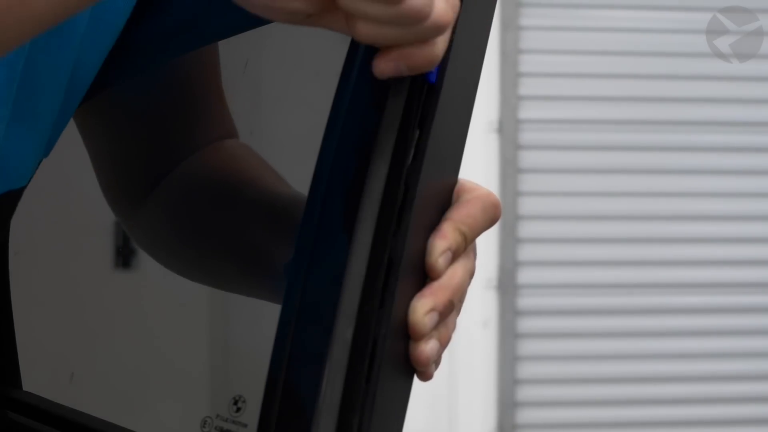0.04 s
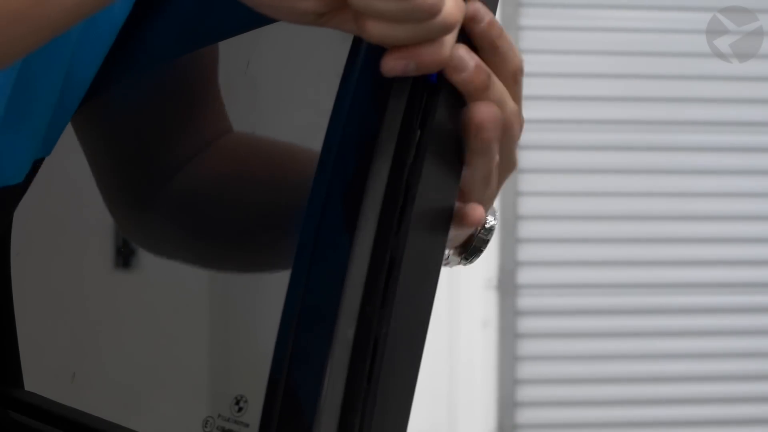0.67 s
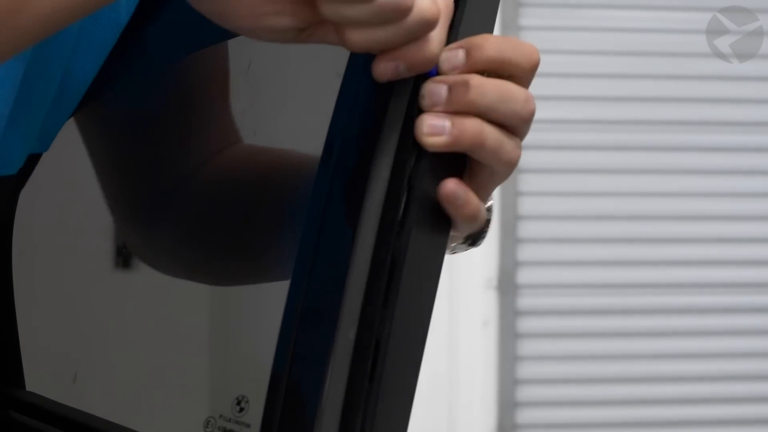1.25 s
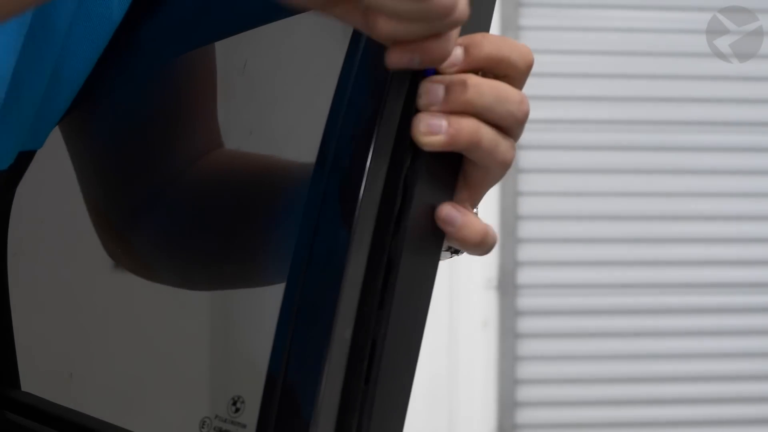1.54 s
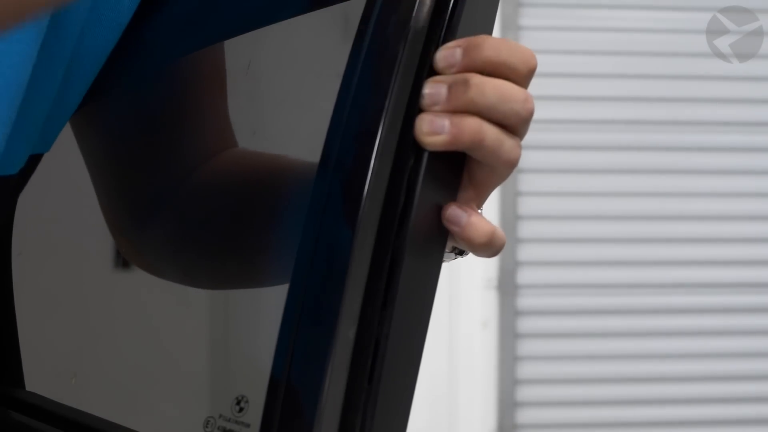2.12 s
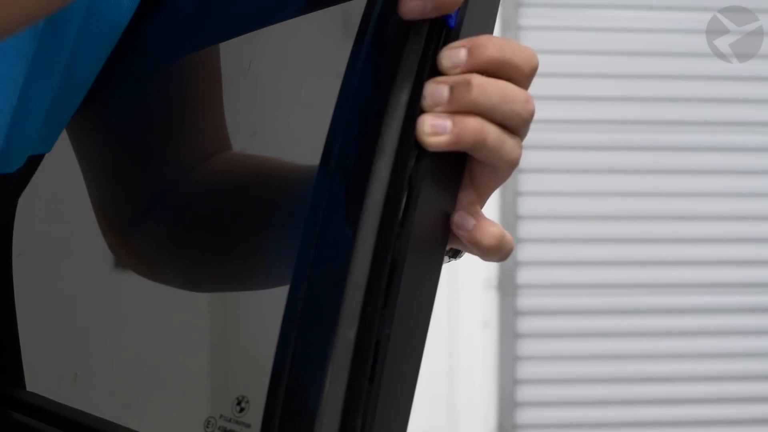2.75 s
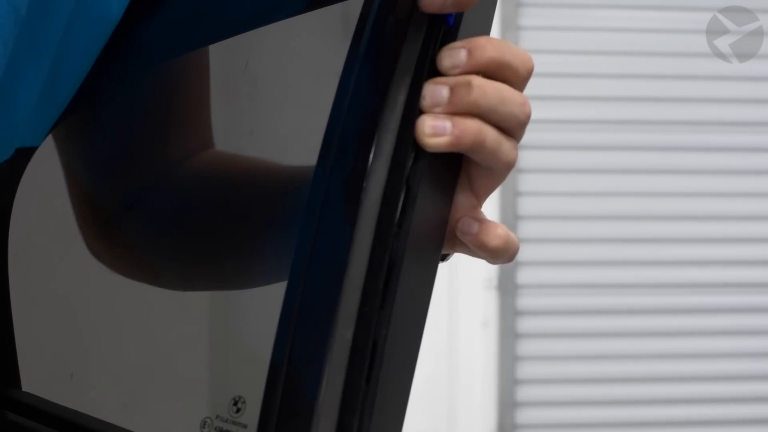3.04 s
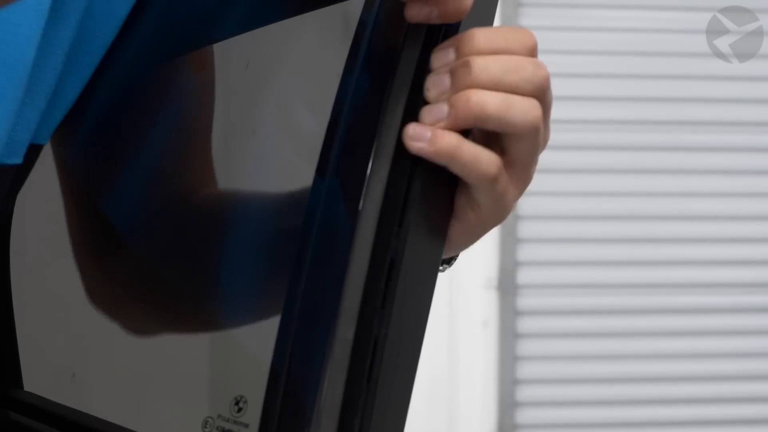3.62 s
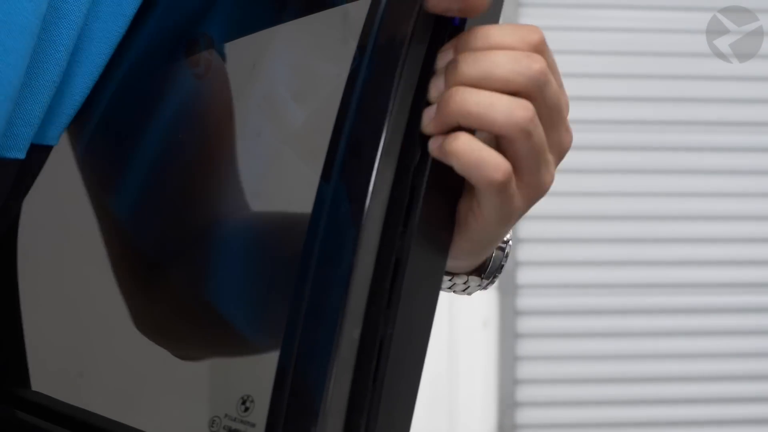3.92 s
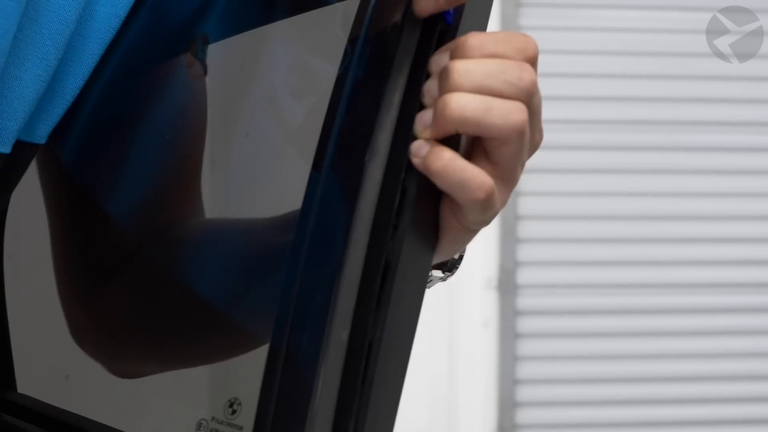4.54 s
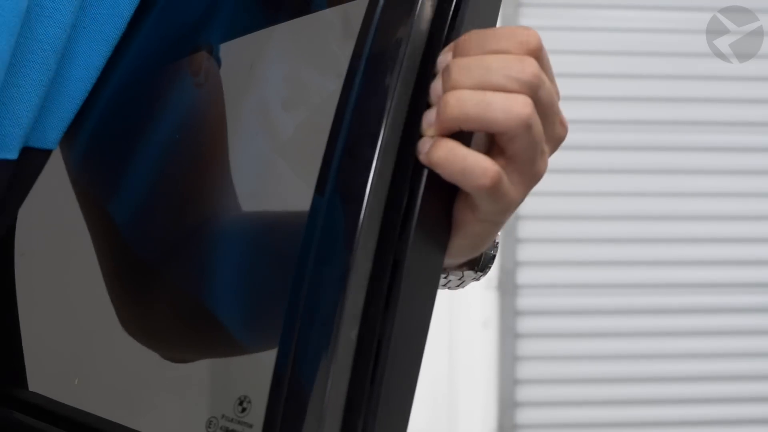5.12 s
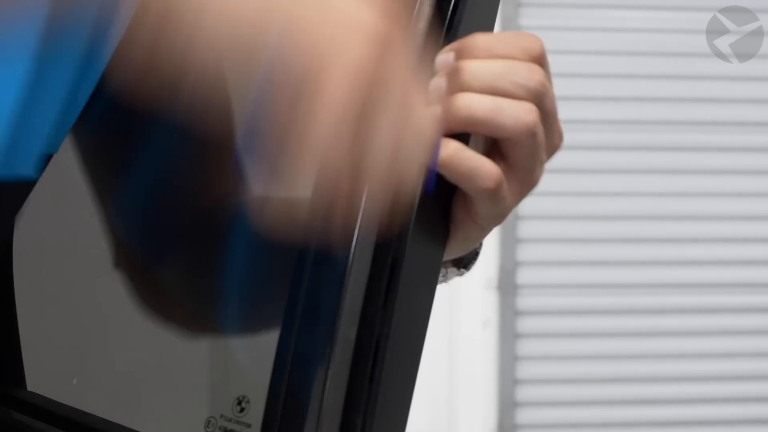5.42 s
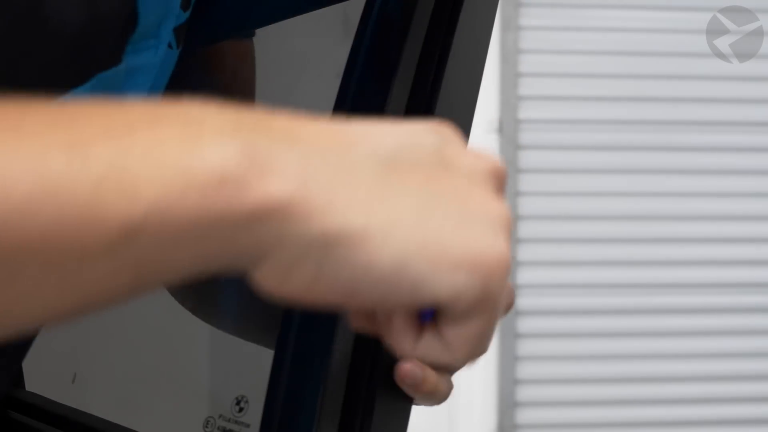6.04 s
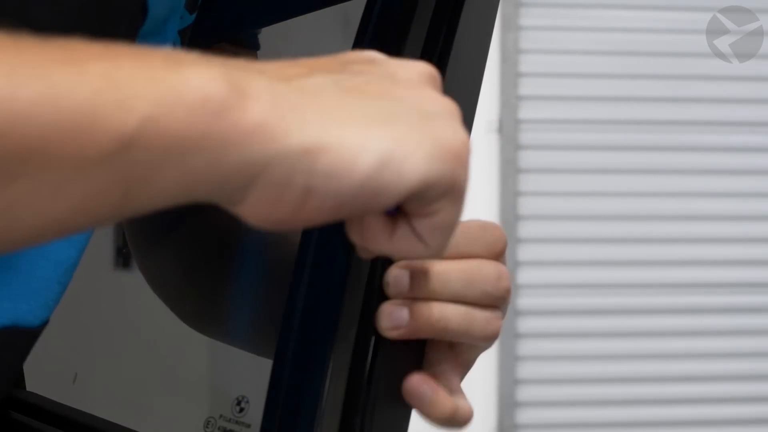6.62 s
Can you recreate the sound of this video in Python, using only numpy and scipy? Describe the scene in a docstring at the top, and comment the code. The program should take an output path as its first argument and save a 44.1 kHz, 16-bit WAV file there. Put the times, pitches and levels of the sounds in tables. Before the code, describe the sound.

A loud knock on a car door's window frame opens the sound, with a low thump from the door panel. Around 0.4 seconds a plastic pry blade scrapes and gives a tiny rising squeak, and a clip clicks at 0.8 seconds as a sleeve rustles softly. From 1.5 to 2.9 seconds come scattered light clicks, short scrapes and dull bumps. The blade creaks briefly at 3 seconds, followed by a click and a soft thump near 3.7. Small clicks at 4.3 lead into the loudest snaps, about four sharp plastic cracks between 4.5 and 4.9 seconds, then a knock and one more snap at 5.1. Lighter taps, scrapes and cloth rustles continue to about 7 seconds. Everything sounds close, with a short workshop reverberation, over a faint steady ventilation rumble and a thin, high electrical whine.

```python
"""A plastic trim tool prises a cover strip off a car door's window frame in a reverberant workshop.
Over a steady ventilation rumble and a thin electrical whine, a knock sets the frame's modes ringing
and the door skin thumps. The blade scrapes and squeaks by stick-slip friction, a sleeve rustles,
and clips begin to let go with sharp snaps. The blade creaks at 3 s; the loudest snaps come between
4.5 and 5 s, and lighter knocks, scrapes and rustles follow."""
import sys
import numpy as np
from scipy import signal
from scipy.fft import rfft, irfft, next_fast_len
from scipy.io import wavfile

SR = 44100
rng = np.random.default_rng(int(sys.argv[2]) if len(sys.argv) > 2 else 0)


def digitize_waveform(pressure):
    """Quantize a signal to 16-bit integers and store it at the path in sys.argv[1].

    Rows of a 2-D input are taken as channels; values are limited to [-1, 1].
    """
    field = np.atleast_2d(pressure).T
    bounded = np.clip(field, -1, 1)
    quanta = np.round(bounded * 32767).astype(np.int16)
    wavfile.write(sys.argv[1], SR, quanta)


N = 302926


def from_db(db):
    return 10 ** (np.asarray(db) / 20)

def unit_rms(x):
    return x / np.sqrt(np.mean(x ** 2) + 1e-20)

def at_hz(points, hz, column=1):
    """Interpolation of one column of a table along a log-frequency axis."""
    table = np.array(points)
    return np.interp(np.log(np.maximum(hz, 1)), np.log(table[:, 0]), table[:, column])

def add(track, time_s, sound):
    """Superposition: a sound sums into the track from the given time."""
    start = int(np.clip(round(time_s * SR), 0, N - 1))
    track[start:start + len(sound)] += sound[:N - start]

def coloured_noise(spectrum):
    """Spectral shaping of white noise, at unit rms."""
    size = next_fast_len(N)
    hz = np.fft.rfftfreq(size, 1 / SR)
    white = rfft(rng.standard_normal(size))
    return unit_rms(irfft(white * from_db(at_hz(spectrum, hz)))[:N])


# ventilation and room air (frequency [Hz], relative spectral density [dB])
AIR_SPECTRUM = [(15, -33.5), (25, -7), (76, -2), (123, -10), (309, -9), (754, -16), (962, -13),
                (1560, -27.5), (2000, -25.5), (3720, -30.5), (4140, -32), (5730, -28), (8590, -37.5),
                (13200, -40.5), (16000, -39)]

def ventilation(rms_db):
    """Broadband noise: moving air, strongest at low frequencies."""
    return from_db(rms_db) * coloured_noise(AIR_SPECTRUM)


# electrical tones and sidebands (frequency [Hz], rms level [dB])
WHINE_LINES = [(1680, -87), (3601, -91), (3720, -86.5), (5405, -83.5), (5523, -86.5), (5642, -82.5),
               (5762, -73), (5882, -83.5), (6121, -87.5), (6245, -92), (6481, -82), (7445, -86.5),
               (8161, -96.5)]

def whine(waver_hz):
    """Line spectrum: each tone wavers under slight random frequency modulation."""
    out = 0
    for hz, db in WHINE_LINES:
        waver = np.interp(np.arange(N), np.linspace(0, N, 140), rng.standard_normal(140))
        phase = 2 * np.pi * np.cumsum(hz + waver_hz * waver) / SR
        out += from_db(db) * np.sqrt(2) * np.sin(phase)
    return out


# limits of the five mode families: thud, knock, snap, crack, sizzle (frequency [Hz])
FAMILY_EDGES = [90, 650, 1600, 4500, 9000, 16000]

def families(modes):
    """Band division: the modes fall into five families by frequency."""
    modes = np.array(modes, float)
    hz = modes[:, 0]
    return [modes[(hz >= low) & (hz < high)] for low, high in zip(FAMILY_EDGES, FAMILY_EDGES[1:])]


# typical pitch of each family (frequency [Hz])
FAMILY_PITCHES = [400, 1000, 2700, 6400, 12000]

def contact_spectra(contacts, balance_db, thud_lag):
    """Spectral tilt about 1600 Hz: a contact's level and brightness become five family levels."""
    rows, octaves = [], np.log2(np.array(FAMILY_PITCHES) / 1600)
    for *timing, db, brightness in contacts:
        droop_db = 0.082 * min(brightness, 0) * octaves ** 2   # soft contacts lose both extremes
        levels_db = db + brightness * octaves + droop_db + np.array(balance_db)
        levels_db[0] -= thud_lag * (db + 50)   # harder contacts are briefer, so the thud falls behind
        rows.append((*timing, *levels_db))
    return rows

def resonate(force, modes, damping=1):
    """Modal superposition: a force drives damped resonators, summed with alternating sign."""
    out = 0
    for k, (hz, width, db) in enumerate(modes):
        radius = np.exp(-np.pi * width * damping / SR)
        feedback = [1, -2 * radius * np.cos(2 * np.pi * hz / SR), radius ** 2]
        gain = (-1) ** k * from_db(db) * (1 - radius ** 2) / 2
        out += gain * signal.lfilter([1, 0, -1], feedback, force + 1e-18)
    return out

def excite(force, modes, levels_db, window_s, damping, detune):
    """Forced response: each family answers at its own rms level over the opening window."""
    out = 0
    for family, db in zip(families(modes), levels_db):
        hz = family[:, 0] * (1 + detune * rng.standard_normal(len(family)))   # load shifts the modes
        ring = resonate(force, np.column_stack([hz, family[:, 1:]]), damping)
        # a narrow part radiates little far below or above its modes
        band_hz = [max(hz.min() / 2.5, 200), min(2 * hz.max(), SR * .45)]
        sound = signal.sosfilt(signal.butter(2, band_hz, "band", fs=SR, output="sos"), ring)
        out += from_db(db) * sound / np.sqrt(np.mean(sound[:int(window_s * SR)] ** 2) + 1e-30)
    return out

IMPACT_WINDOW_S, SHORTEST_SLIP_S = .015, .0005

def impacts(contacts, modes, grit, soften_db, damping, detune):
    """Impact excitation: an impulse and a short gritty slip, which lasts longer in gentle blows."""
    out, t = np.zeros(N), np.arange(SR // 8) / SR
    hardest_db = np.max(np.array(contacts)[:, 1:])
    for time_s, *levels_db in contacts:
        slip_s = SHORTEST_SLIP_S * from_db(soften_db * (hardest_db - max(levels_db)) / 20)
        force = grit * rng.standard_normal(len(t)) * np.exp(-t / slip_s)
        force[0] += 1
        add(out, time_s, excite(force, modes, levels_db, IMPACT_WINDOW_S, damping, detune))
    return out

def radiate_to_walls(contacts, modes, blur, size=512):
    """Incoherent summation: over all directions the modes add by power, without notches."""
    hz, out = np.fft.rfftfreq(size, 1 / SR), np.zeros(N)
    shapes = []
    for family in families(modes):
        shape = sum(from_db(db) ** 2 / (1 + ((hz - centre) / (blur * width)) ** 2) ** 2
                    for centre, width, db in family)
        shapes.append(shape / shape.mean())
    for time_s, *levels_db in contacts:
        power = from_db(levels_db) ** 2 @ np.array(shapes) * IMPACT_WINDOW_S * SR
        pulse = np.fft.fftshift(irfft(np.sqrt(power)))
        add(out, time_s, pulse * np.hanning(size))
    return out


# door frame resonances (frequency [Hz], nominal bandwidth [Hz], gain [dB])
FRAME_MODES = [(240, 22, -22), (315, 26, -2.5), (384.7, 31, -1.5), (465, 56, -9.5), (545, 37, -6.5),
               (687, 110, 1.5), (706, 180, -12), (843, 21, -4), (1043.7, 120, -6.5), (1141, 120, -2),
               (1233, 85, -0.5), (1460, 130, -8.5), (1490, 62, -9), (1660, 210, -11), (1868, 540, -16),
               (2520, 300, -13.5), (3212, 230, -8), (3690, 690, -18.5), (4410, 240, -15), (5150, 350, -13),
               (6100, 530, -13.5), (7256, 260, -20), (9700, 2000, -22), (13150, 490, -19)]
# weight of each family in a knock (gain [dB])
KNOCK_WEIGHTS = [-4, 0.5, -1.5, 0.5, -1.5]
# tool and hands meet the frame (time [s], nominal level [dB], brightness [dB/octave])
FRAME_KNOCKS = [(.0297, -19, -2.5), (.4165, -57.5, -3.5), (.4562, -57, -4.5), (.8451, -53.5, -5.5),
                (1.0983, -67, -7.5), (1.5903, -57, -5.5), (1.8264, -56, -7.5), (1.8935, -55, -7.5),
                (2.2989, -61, -4.5), (2.4635, -59, -5.5), (2.4874, -57, -5), (2.767, -60.5, -7.5),
                (3.1746, -66.5, -5), (3.757, -63, -5.5), (3.8056, -56, -6), (4.159, -65.5, -6),
                (4.2072, -71, -7.5), (4.9185, -42.5, -4.5), (5.4956, -64, -3.5), (5.981, -60, -9.5),
                (6.1558, -62.5, -6), (6.3133, -61.5, -10)]

def frame_knocks():
    """Free vibration of the struck frame; returns the direct sound and that sent to the walls."""
    knocks = contact_spectra(FRAME_KNOCKS, KNOCK_WEIGHTS, thud_lag=0.17)
    direct = impacts(knocks, FRAME_MODES, grit=0.21, soften_db=8, damping=0.83, detune=.015)
    return direct, radiate_to_walls(knocks, FRAME_MODES, blur=1.5)

def ring_from_taps(taps, modes):
    """Impulse response: clean taps ring a few modes, scaled to peak at the highest tap level."""
    force = np.zeros(N)
    for time_s, db in taps:
        add(force, time_s, from_db([db]))
    top_hz = max(mode[0] for mode in modes)
    ring = signal.sosfilt(signal.butter(2, top_hz, fs=SR, output="sos"), resonate(force, modes))
    return ring * force.max() / np.abs(ring).max()


# door skin resonances (frequency [Hz], bandwidth [Hz], gain [dB])
DOOR_MODES = [(102.06, 30, -4.5), (128, 22, -7), (166, 14, -1.5), (222.7, 30, 5), (294, 38, 1)]
# heavy pushes (time [s], level [dB])
DOOR_PUSHES = [(.034, -35.5), (1.526, -50), (1.895, -41), (2.3, -47), (3.758, -42.5), (4.922, -44),
               (6.315, -50.5)]

def door_thumps():
    """Panel vibration: the door gives under a push and rings in its low modes."""
    return ring_from_taps(DOOR_PUSHES, DOOR_MODES)


# echoes from floor and nearby walls (delay [s], gain [dB])
ECHO_PATHS = [(.0085, -24.5), (0.0272, -23), (.0305, -22), (0.037, -25), (.0615, -61), (.088, -26)]

def early_reflections(x, cutoff_hz):
    """Specular reflection: each path returns a delayed, dulled copy."""
    out = np.zeros(N)
    dulled = signal.sosfilt(signal.butter(1, cutoff_hz, fs=SR, output="sos"), x)
    for delay_s, db in ECHO_PATHS:
        add(out, delay_s, from_db(db) * dulled)
    return out


# workshop reverberation (frequency [Hz], energy gain [dB], reverberation time T60 [s])
ROOM_DECAY = [(100, -10.5, 0.95), (348.1, -10.5, 0.88), (674, -8, .75), (1190, -7.5, .8),
              (1970, -13.5, 0.79), (3516, -15.5, 0.84), (6000, -16, .65), (8833, -18, 0.42),
              (14230, -26.5, 0.27)]

def reverberation(x, wall_delay_s, early_db):
    """Diffuse field: it swells as sound returns from the walls, then decays, the treble first."""
    t, hz = np.arange(SR) / SR, np.fft.rfftfreq(SR, 1 / SR)
    white = rfft(rng.standard_normal(SR))
    swell = np.where(t < wall_delay_s, from_db(early_db), 1)
    edges, response = np.geomspace(60, 17000, 19), np.zeros(SR)
    for low, high in zip(edges, edges[1:]):
        centre = np.sqrt(low * high)
        band = irfft(white * (hz >= low) * (hz < high), SR)
        decay = from_db(-60 * t / at_hz(ROOM_DECAY, centre, column=2))
        gain = from_db(at_hz(ROOM_DECAY, centre)) * np.sqrt(2 * (high - low)) / SR
        response += gain * unit_rms(band * swell * decay)
    return signal.fftconvolve(x, response)[:N]


# plastic strip resonances (frequency [Hz], nominal bandwidth [Hz], gain [dB])
STRIP_MODES = [(165, 32, -15.5), (225, 44, -15), (305.5, 31, -10.5), (388, 18, -12), (603, 87, -17),
               (679, 60, -7), (883, 78, -9.5), (1172, 80, -1), (1386, 64, -3), (1607.8, 140, 2.5),
               (1863, 73, 7), (2190, 570, 5), (2664, 680, 2.5), (2784, 105, 9.5), (3420, 450, 4),
               (3870, 110, 2.5), (4080, 210, -9), (4640, 245, -2.5), (5110, 1700, -5.5), (6290, 940, -3.5),
               (7860, 460, -17.5), (9600, 210, -17), (11470, 820, -16), (13700, 2000, -20.5)]
# weight of each family in a scrape (gain [dB])
SCRAPE_WEIGHTS = [1, 0, 6.5, 2.5, -8]
# blade and fingers slide (time [s], duration [s], nominal level [dB], brightness [dB/octave])
SCRAPE_STROKES = [(.43, 0.019, -57.5, -4), (.538, 0.017, -61.5, -2), (1.536, 0.057, -73, -7.5),
                  (1.831, 0.02, -57.5, -5), (1.852, 0.03, -53.5, -3.3), (2.38, 0.048, -72.5, -3),
                  (2.428, 0.06, -64, -2), (2.497, 0.06, -67, -6.5), (2.652, 0.017, -57, -3),
                  (3.19, .12, -74, -4), (3.751, .022, -59, 0.2), (4.256, 0.065, -70.5, -3.5),
                  (5.096, .015, -48, 0.4), (5.595, 0.058, -65.5, -3.5), (6.492, 0.056, -66, -0.7)]

def strip_scrapes(slips_per_s, spread_db):
    """Stick-slip friction: each stroke sends a rush of uneven clicks into the strip."""
    out, t = np.zeros(N), np.arange(SR // 5) / SR
    strokes = contact_spectra(SCRAPE_STROKES, SCRAPE_WEIGHTS, thud_lag=0.18)
    for time_s, length_s, *levels_db in strokes:
        pressure = np.sqrt(np.interp(t / length_s, [0, 0.1, 1], [0, 1, 0]))   # bites, then eases off
        slips = (rng.random(len(t)) < slips_per_s / SR) * rng.choice([-1, 1], len(t))
        force = pressure * slips * from_db(spread_db * rng.standard_normal(len(t)))
        add(out, time_s, excite(force, STRIP_MODES, levels_db, length_s, damping=1.1, detune=0.067))
    return out


# the blade is drawn out (time [s], frequency [Hz], level [dB])
SQUEAK_GLIDE = [(.431, 2500, -69), (.435, 3380, -61), (0.439, 4300, -57), (0.445, 5050, -57),
                (.45, 5200, -75)]

def blade_squeak():
    """Periodic stick-slip: the slips come fast enough to fuse into one rising tone."""
    t = np.arange(N) / SR
    times, hz, db = np.transpose(SQUEAK_GLIDE)
    envelope = from_db(np.interp(t, times, db)) * (t > times[0]) * (t < times[-1])
    phase = 2 * np.pi * np.cumsum(np.interp(t, times, hz)) / SR
    return envelope * np.sin(phase)


# rubbing cloth (frequency [Hz], relative spectral density [dB])
CLOTH_SPECTRUM = [(100, -6), (350, -4.5), (1200, -5.5), (2000, -6.5), (3200, -5.5), (4200, -15.5),
                  (5500, -6.5), (8500, -19.5), (13000, -15), (16000, -19.5)]
# moves of the arm (time [s], duration [s], highest rms level [dB])
SLEEVE_MOVES = [(0.47, 0.42, -66), (0.716, 0.85, -68.5), (2.62, 0.5, -75), (3.126, 1, -66),
                (3.893, 0.28, -76), (5.624, 0.51, -66), (6.552, 0.88, -70.5)]

def sleeve_rustle():
    """Friction noise: the hiss of cloth swells and fades with the speed of the arm."""
    t = np.arange(N) / SR
    speed = sum(from_db(db) * np.interp((t - time_s) / length_s, [0, 0.24, 1], [0, 1, 0])
                for time_s, length_s, db in SLEEVE_MOVES)
    return speed * coloured_noise(CLOTH_SPECTRUM)


# weight of each family in a snap (gain [dB])
SNAP_WEIGHTS = [-4.5, -0.5, 5, 0.5, -11]
# clips and blade snap on the strip (time [s], nominal level [dB], brightness [dB/octave])
CLIP_SNAPS = [(.82, -44.5, -4.5), (1.333, -68, -2), (1.5244, -53.5, -1.5), (1.8902, -60, 4.8),
              (2.275, -68, -1.7), (2.5173, -52.5, -1.5), (2.9203, -61.5, 0.5), (3.2685, -61.5, -3.5),
              (3.5949, -49.5, -5.5), (4.2498, -58, -4.5), (4.3038, -51, -2.5), (4.3746, -65, -1.7),
              (4.5477, -29, 2.5), (4.601, -34.5, -2.5), (4.8005, -37, -3.5), (4.8313, -28, -2.5),
              (5.0902, -43, -3), (5.9389, -68.5, 4.5)]

def clip_snaps():
    """Sudden elastic release rings the strip; returns the direct sound and that sent to the walls."""
    snaps = contact_spectra(CLIP_SNAPS, SNAP_WEIGHTS, thud_lag=.57)
    direct = impacts(snaps, STRIP_MODES, grit=0.35, soften_db=11, damping=0.95, detune=0.051)
    return direct, from_db(-1.5) * radiate_to_walls(snaps, STRIP_MODES, blur=1.9)


# tool blade resonances (frequency [Hz], bandwidth [Hz], gain [dB])
BLADE_MODES = [(3130, 280, -2), (3780, 150, -5), (4640, 490, -5)]
# three quick slips (time [s], level [dB])
CREAK_SLIPS = [(2.9879, -38), (2.9962, -36.5), (3.0115, -38)]

def blade_creak():
    """Intermittent stick-slip: each separate slip rings the blade's modes."""
    return ring_from_taps(CREAK_SLIPS, BLADE_MODES)


def scene():
    """Superposition of the direct sound, the room's response and the steady background, in mono."""
    knocks, knocks_to_walls = frame_knocks()
    snaps, snaps_to_walls = clip_snaps()
    scrapes = strip_scrapes(slips_per_s=1300, spread_db=5.5)
    handling = door_thumps() + scrapes + blade_squeak() + blade_creak()
    direct = knocks + snaps + handling
    to_walls = knocks_to_walls + snaps_to_walls + from_db(-3) * handling
    echoes = early_reflections(direct, cutoff_hz=2508)
    tail = reverberation(to_walls, wall_delay_s=0.015, early_db=-1.5)
    background = ventilation(rms_db=-65) + whine(waver_hz=.8)
    return (direct + echoes + tail + sleeve_rustle() + background)[None]

def record(dry):
    """Band limiting: the sound, held within full scale, is cut steeply above 16250 Hz."""
    lowpass = signal.ellip(10, .1, 80, 16250, fs=SR, output="sos")
    return signal.sosfilt(lowpass, np.clip(dry, -1, 1))


dry = scene()
out = record(dry)
digitize_waveform(out)
```